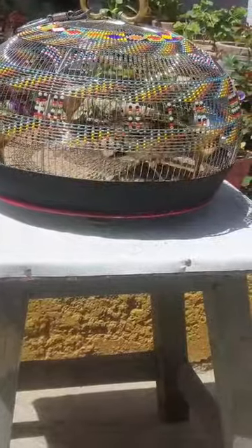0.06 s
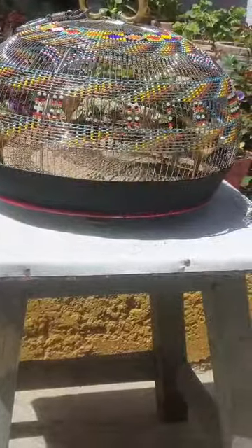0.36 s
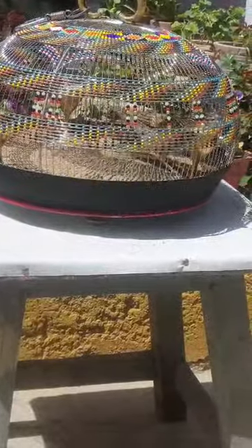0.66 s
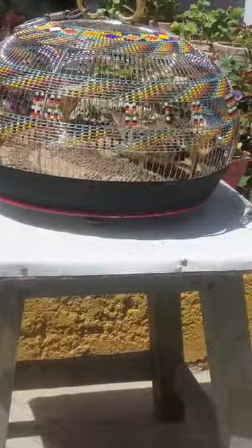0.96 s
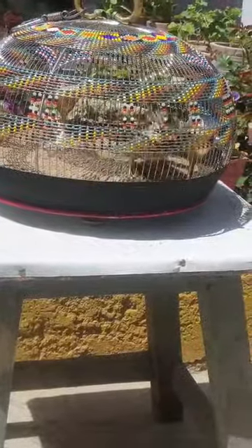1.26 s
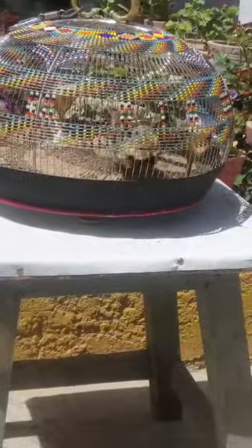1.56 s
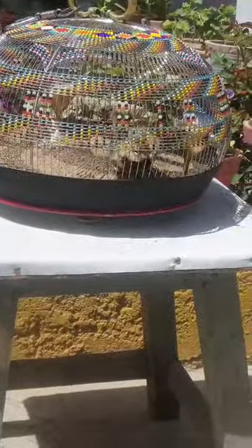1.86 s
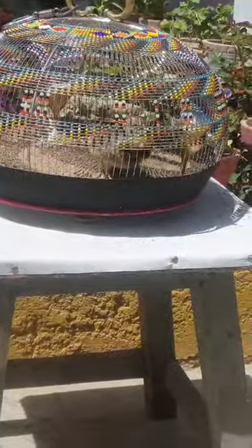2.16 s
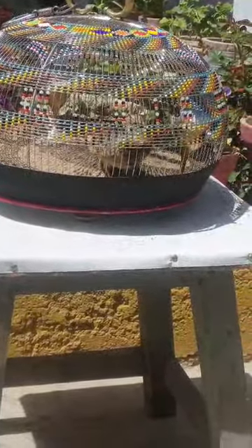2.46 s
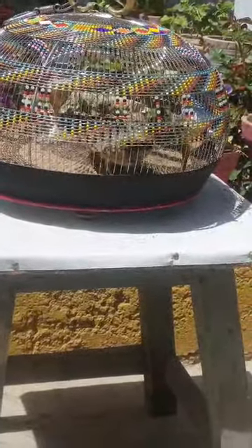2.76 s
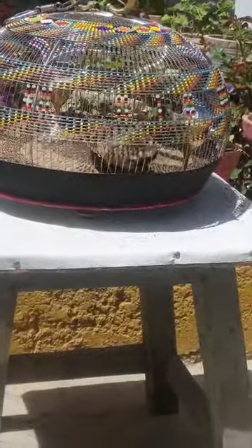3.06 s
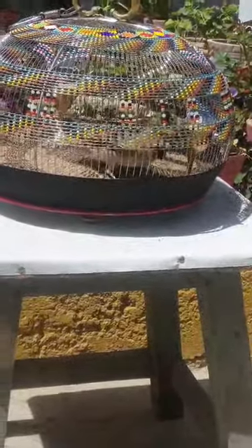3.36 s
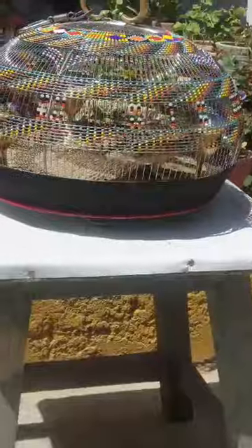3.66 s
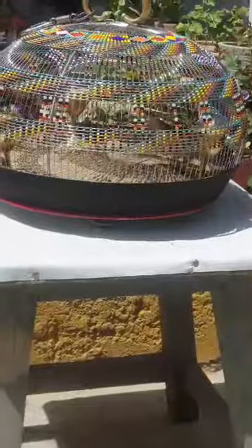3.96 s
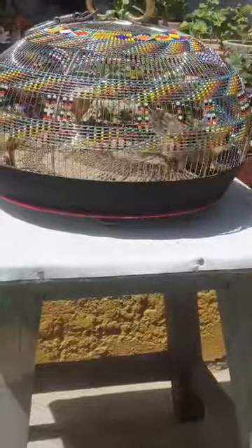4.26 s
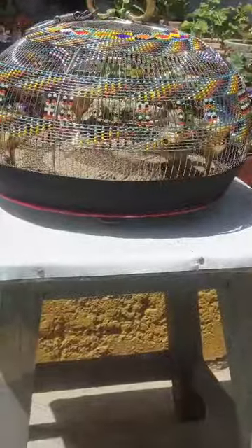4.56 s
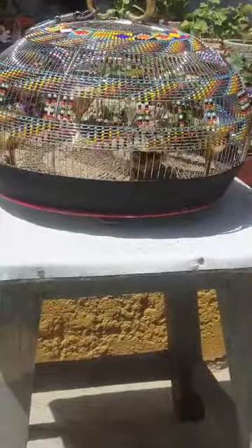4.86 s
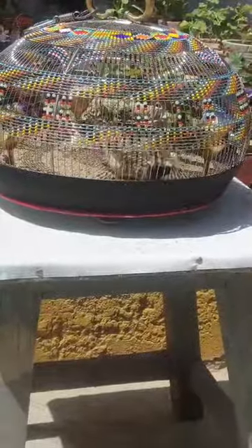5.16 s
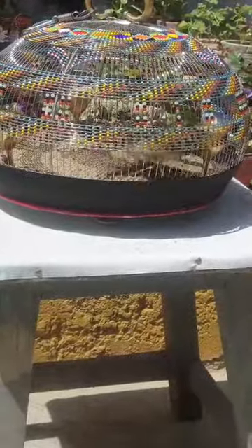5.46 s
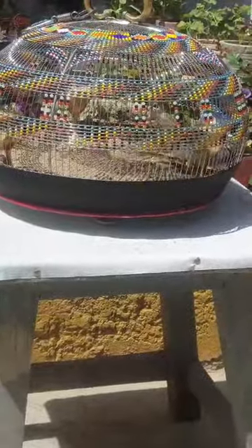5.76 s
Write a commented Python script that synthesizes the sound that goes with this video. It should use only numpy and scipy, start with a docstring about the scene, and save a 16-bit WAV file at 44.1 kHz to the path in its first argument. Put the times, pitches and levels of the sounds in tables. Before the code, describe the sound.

Small caged birds sing high chirps, a rapid trill, loud slurred whistles and two harsh rasps over a faint outdoor hum.

```python
"""Caged larks in a walled courtyard

Close to a two-port microphone, a phrase runs from thin seeps through rising hooks and dry chips into
a trill; loud slurred whistles and two harsh rasps follow. Membranes in the syrinx vibrate, throat and
beak filter the tone, and the walls reflect it. A bird scuffs the cage floor and pecks the wire;
others call farther off, over a faint motor hum and outdoor rumble."""
import sys
import numpy as np
from scipy import signal
from scipy.fft import rfft, irfft, next_fast_len
from scipy.io import wavfile
from scipy.ndimage import uniform_filter1d

SR = 44100
rng = np.random.default_rng(int(sys.argv[2]) if len(sys.argv) > 2 else 0)


def store_wav(level_fs):
    """Save 16-bit WAV to argv[1]."""
    pcm = np.round(np.clip(np.atleast_2d(level_fs), -1, 1) * 32767)
    wavfile.write(sys.argv[1], SR, pcm.T.astype(np.int16))


N = 264600
FREQS = np.fft.rfftfreq(N, 1 / SR)
TIME = np.arange(N) / SR

# The gesture of a chip. Each row: share of the note's length, pitch factor, relative level in dB.
CHIP_GESTURE = [(0, 0.62, -10.5), (0.301, 0.72, -10.5), (0.55, 0.97, -1), (0.798, 0.96, 3.5),
                (0.998, 0.76, -19.5)]


def whistles():
    """Pitch and effort move together: held notes scoop up and settle; slurs peak as they drop."""
    # Each row: start and length in seconds, peak, settled and final pitch in Hz, level in dB,
    # quivers per second, swing as a share of the pitch.
    held_notes = [(3.14, .06, 5350, 5074, 5100, -22.5, 150, 0.035),
                  (3.19, 0.11, 5280, 5170, 5160, -25.5, 96, 0.028),
                  (3.52, .14, 5316, 5175, 5210, -22.5, 80, 0.032),
                  (3.852, 0.13, 5430, 4910, 5003, -22.5, 240, 0.043),
                  (4.024, .145, 4714, 4475, 4740, -21, 120, 0.028),
                  (4.364, .14, 4626, 4422, 4660, -16.5, 117, 0.031)]
    # Each row: start, length and time to the drop in seconds, top and bottom pitch in Hz,
    # levels of drop and tail in dB before the fade, quivers per second.
    slurs = [(3.353, .125, .025, 5300, 3870, -13.5, -18, 81),
             (3.649, .16, .022, 5450, 4020, -14.5, -21, 61),
             (4.161, .13, .014, 4830, 3840, -16, -20.5, 126), (4.504, .11, .026, 4620, 3740, -15, -17, 96)]
    scoop_s, settle_s = 0.013, 0.034
    fall_hz_per_s, slur_settle_s = 52000, 0.016
    out = np.zeros(N)
    for s, length, peak_hz, settled_hz, final_hz, db, rate, swing in held_notes:
        t = np.arange(0, length, 1 / SR)
        hz = np.interp(t, [0, scoop_s, settle_s, length], [.87 * peak_hz, peak_hz, settled_hz, final_hz])
        effort_db = np.interp(t, [0, scoop_s, 0.49 * length, length], [-13.5, 0, 0, -14])
        add(out, s, whistle(hz, db + effort_db, rate, swing * np.minimum(t / settle_s, 1)))
    for s, length, drop_s, top_hz, bottom_hz, db, tail_db, rate in slurs:
        t = np.arange(0, length, 1 / SR)
        hz = np.clip((top_hz + bottom_hz) / 2 - fall_hz_per_s * (t - drop_s), bottom_hz, top_hz)
        tail_swing = 0.03 * np.clip(2 * (t - drop_s) / slur_settle_s - 1, 0, 1)
        effort_db = np.interp(t, [0, drop_s, drop_s + slur_settle_s], [db - 18, db, tail_db])
        fade_db = -14 * (t / length) ** 2
        add(out, s, whistle(hz, effort_db + fade_db, rate, tail_swing))
    return out


def whistle(hz, db, rate, swing):
    """Coupled frequency and amplitude modulation of a nearly pure tone; echoes turn it into beating."""
    # Throat and beak response. Each row: frequency in Hz, gain in dB.
    throat = [(2000, -24), (2700, -28.5), (3700, 5), (5400, -3), (7200, -4.5), (8900, 1.5), (11000, -4.5),
              (15500, 2.5)]
    turn = 2 * np.pi * np.cumsum(rate * (1 + .12 * wander(len(hz), 36))) / SR
    quiver = swing * np.sin(turn + .5 * np.sin(turn))  # lopsided swings
    level_db = db + .7 * wander(len(hz), 30) - 80 * quiver  # softer as the pitch swings up
    pitch = uniform_filter1d(hz, size=200) * (1 + quiver)
    tone = syrinx(pitch, throat, overtone_db=-22.5, jitter=.008, hiss_db=-37, half_db=-17.5)
    return amp(level_db) * tone


def seeps():
    """Resonance favours the second harmonic of thin rising notes; a hoarser note ends the run."""
    # Each row of both: start and length in seconds, pitch in Hz, level in dB.
    thin_notes = [(.031, 0.076, 3084, -22.5), (.217, 0.067, 3023, -20.5), (.384, .066, 2978, -19.5),
                  (.547, 0.047, 2925, -19)]
    hoarse_notes = [(.715, .041, 3200, -24.5)]
    # Each row: share of the note's length, pitch factor, relative level in dB.
    gesture = [(0, .82, -25.5), (.12, 0.875, -14), (.35, 0.94, -4.5), (.6, .985, -1), (.85, 0.97, -2.5),
               (1, .96, -19.5)]
    # Throat and beak response. Each row: frequency in Hz, gain in dB.
    throat = [(1800, -21), (3050, -2.5), (4300, 6.5), (5100, 12.5), (5900, 14), (7200, -13.5), (8600, 10.5),
              (10000, -23.5), (12000, -6.5), (15000, -4)]
    thin = syllables(thin_notes, gesture, throat, overtone_db=-7, jitter=.0015, hiss_db=-36)
    hoarse = syllables(hoarse_notes, CHIP_GESTURE, throat,
                       overtone_db=-16, jitter=.0077, hiss_db=-13.5, half_db=-41)
    return thin + hoarse


def chatter(flick_hz=4600, flick_s=0.0063, flick_db=-25.5):
    """Two-sided voicing: the syrinx's other side ends each hook in a flick; quicker dry chips follow."""
    # Each row of both: start and length in seconds, pitch in Hz, level in dB.
    hook_notes = [(0.831, 0.036, 3416, -19), (.926, 0.036, 3293, -20), (1.023, .04, 3290, -20.5),
                  (1.128, 0.036, 3267, -17.5)]
    chip_notes = [(1.226, 0.018, 1880, -25.5), (1.288, 0.016, 1514, -24), (1.347, 0.011, 1510, -23),
                  (1.401, 0.014, 1363, -25.5)]
    # Each row: share of the note's length, pitch factor, relative level in dB.
    hook_gesture = [(0, .33, -45), (0.301, 0.61, -9), (.5, 0.79, -14.5), (.62, 0.9, 0.5), (.74, 0.96, 1),
                    (.87, 0.95, 1), (1, 0.88, -3)]
    # Throat and beak responses. Each row: frequency in Hz, gain in dB.
    hook_throat = [(600, -36), (1300, 8), (3300, -7), (4500, 2), (6400, -5), (7800, -10), (9300, -8),
                   (11000, -21), (12700, -8.5), (15500, -23)]
    chip_throat = [(700, -30), (3000, 15.5), (4200, 6.5), (6500, -13), (9000, -10), (15500, -23)]
    hooks = syllables(hook_notes, hook_gesture, hook_throat, overtone_db=-25, jitter=.0022, hiss_db=-40)
    flick_pitch = flick_hz * np.geomspace(1, .93, int(flick_s * SR))
    for s, length, _, db in hook_notes:
        add(hooks, s + length - flick_s, amp(db + flick_db) * pure_note(flick_pitch))
    chips = syllables(chip_notes, CHIP_GESTURE, chip_throat, overtone_db=-1, jitter=.012, hiss_db=-14)
    return hooks + chips


def trill(count=20, start_s=1.45, gap_s=.04835, slowing_s=.00058, loudest_s=2.01):
    """Slowing, arched notes each end in a flick as the third harmonic falls into a throat resonance."""
    # Each row: share of the note's length, pitch factor, relative level in dB.
    gesture = [(0, .94, -15), (.2, .99, -4), (.45, 1.01, -1), (.64, .99, -4), (.74, 1.05, -15),
               (.85, .88, -5), (1, .72, -24)]
    # Throat and beak response. Each row: frequency in Hz, gain in dB.
    throat = [(1000, -15.5), (1750, -7), (2450, 6), (3200, 7), (3900, -22), (7000, -20), (9300, -47.5),
              (12000, -23.5), (13500, -47)]
    k = np.arange(count)
    starts = start_s + gap_s * k + slowing_s * k * (k - 1) / 2
    levels_db = -24.5 - 13 * (starts - loudest_s) ** 2 + .7 * rng.standard_normal(count)
    lengths = .028 * (1 + .05 * rng.standard_normal(count))
    pitches_hz = 1241.3 + 12.5 * (levels_db + 23.5)  # stronger notes are higher
    notes = zip(starts, lengths, pitches_hz, levels_db)
    return syllables(notes, gesture, throat, overtone_db=3, jitter=.011, hiss_db=-20, half_db=-14)


def rasps(rest_hz=1376, upper_hz=2300, hold_s=0.074, fade_db_per_s=110):
    """Biphonation: where the fluttering call is rough, the syrinx's other side joins in higher up."""
    # Each row: start and length in seconds, top pitch in Hz, time to the top, width of the rise and
    # attack in seconds, overtone gain in dB, final flutters per second, level in dB.
    calls = [(4.955, .335, 1788, .07, .21, .044, -20, 42, -34),
             (5.442, .34, 2116, 0.084, .115, 0.0135, -28, 66, -34)]
    # Throat and beak response. Each row: frequency in Hz, gain in dB.
    throat = [(800, -5), (1700, -7.5), (2450, 19), (3300, 0.5), (3800, -17), (5400, -15), (6700, -13),
              (7800, -41), (11000, -24), (14000, -52)]
    out = np.zeros(N)
    for s, length, top_hz, top_s, width_s, attack_s, overtone_db, last_rate, level_db in calls:
        t = np.arange(0, length, 1 / SR)
        hz = rest_hz + (top_hz - rest_hz) * np.exp(-((t - top_s) / width_s) ** 2)
        onset_db = -21 * np.maximum(1 - t / attack_s, 0)
        fade_db = -fade_db_per_s * np.maximum(t - top_s - hold_s, 0)
        rough = 1 / (1 + ((t - .1) / .064) ** 6)  # the voice breaks up while pushed hardest
        rate = np.geomspace(62, last_rate, len(t)) * (1 + 0.094 * wander(len(t), 50))
        arch = abs(np.sin(np.pi * np.cumsum(rate) / SR)) - 2 / np.pi
        flutter = 1 + 0.15 * arch
        lower = syrinx(hz * flutter, throat, overtone_db, jitter=0.014 + 0.023 * rough, hiss_db=-26)
        upper = syrinx(upper_hz * flutter, throat, overtone_db=3.5, jitter=0.0575, hiss_db=-24)
        upper_share = 0.67 * rough
        voice = np.sqrt(1 - upper_share) * lower + np.sqrt(upper_share) * upper
        add(out, s, amp(level_db + onset_db + fade_db + 4.9 * arch) * voice)
    return out


def syllables(notes, gesture, throat, overtone_db, jitter, hiss_db, half_db=-np.inf):
    """One gesture modulates the pitch and amplitude of every note, never quite alike."""
    out = np.zeros(N)
    share, bend, effort_db = np.transpose(gesture)
    for s, length, hz, db in notes:
        progress = np.linspace(0, 1, int(length * SR))
        pitch = hz * np.interp(progress, share, bend) * (1 + 0.015 * wander(len(progress), 160))
        envelope = amp(db + np.interp(progress, share, effort_db))
        add(out, s, envelope * syrinx(pitch, throat, overtone_db, jitter, hiss_db, half_db))
    return out


def syrinx(hz, throat, overtone_db, jitter, hiss_db, half_db=-np.inf):
    """Source and filter: a jittering membrane tone and air hiss pass the throat; power is near 1."""
    size = len(hz)
    phase = 2 * np.pi * np.cumsum(hz * (1 + jitter * wander(size, 484))) / SR
    order = np.arange(1, 25)[:, None] / 2  # unequal cycles add half-order lines
    source_db = overtone_db * (order > 1) + np.where(order % 1 > 0, half_db, 0)
    gains = amp(source_db + read(throat, order * hz)) * (order * hz < SR / 2)
    tone = (gains * np.sin(order * phase)).sum(0) / np.sqrt((gains ** 2).sum(0) / 2)
    soft_edges = signal.windows.tukey(size, min(0.0016 * SR / size, 1))
    return (tone + amp(hiss_db) * coloured_noise(size, throat)) * soft_edges


def pure_note(hz, waver_hz=55):
    """Random frequency modulation makes a soft-edged sine waver."""
    hz = hz + waver_hz * wander(len(hz), 500)
    return unit(np.sin(2 * np.pi * np.cumsum(hz) / SR)) * signal.windows.tukey(len(hz), .2)


def scuff(peak_s=1.936, width_s=0.089, level_db=-43.5, grain_db=3):
    """Friction on the cage floor gives a grainy rustle that swells and dies away."""
    # Each row: frequency in Hz, relative spectral density in dB.
    spectrum = [(700, -23), (1400, -3.5), (3000, 3), (6000, -12), (8000, -22), (10000, -28), (15000, -42)]
    rustle = unit(coloured_noise(N, spectrum) * amp(grain_db * wander(N, 230)))
    return amp(level_db) * rustle * np.exp(-((TIME - peak_s) / width_s) ** 2)


def peck(start_s=5.344, hz=4380, level_db=-44, decay_s=0.00094):
    """An impact on the cage wire excites one heavily damped mode: a tiny dry tick."""
    out, t = np.zeros(N), TIME[:SR // 50]
    add(out, start_s, amp(level_db) * np.sin(2 * np.pi * hz * t) * np.exp(-t / decay_s))
    return out


def far_birds(twitter_swing=.16, twitter_period_s=.065, buzz_hz=5350):
    """Frequency-modulated calls, faint with distance: twitters, rising glides, a buzz and a low cry."""
    # Each row: start and length in seconds, centre pitch in Hz, final level in dB.
    twitters = [(0.166, .05, 4220, -57), (0.421, 0.057, 3840, -50), (2.663, 0.075, 3640, -49.5),
                (2.823, 0.063, 3680, -52)]
    # Each row: start and length in seconds, first and last pitch in Hz, level in dB.
    glides = [(0.35, 0.024, 3300, 4900, -57), (2.868, 0.012, 4900, 6160, -51.5),
              (2.941, 0.023, 5040, 5980, -51.5), (3.092, .25, 1430, 1791, -57),
              (3.11, 0.027, 2397, 4460, -49.5)]
    # Each row: time in seconds, level in dB.
    buzz_curve = [(5.2, -63), (5.4, -57), (5.58, -60)]
    # Each row: time in seconds, pitch in Hz, level in dB.
    cry_curve = [(5.74, 1015, -62), (5.85, 945, -49.5), (5.93, 921, -52), (6, 916, -49)]
    # Throat and beak response. Each row: frequency in Hz, gain in dB.
    cry_throat = [(450, -31.5), (950, 13.5), (1850, 25.5), (2800, -24.5), (6000, -32), (8000, -50)]
    out = np.zeros(N)
    for s, length, hz, db in twitters:
        swing = np.cos(2 * np.pi * np.arange(0, length, 1 / SR) / twitter_period_s)
        rise_db = np.linspace(-7, 0, len(swing))
        add(out, s, amp(db + rise_db) * pure_note(hz * (1 + twitter_swing * swing)))
    for s, length, first_hz, last_hz, db in glides:
        add(out, s, amp(db) * pure_note(np.geomspace(first_hz, last_hz, int(length * SR))))
    s, db = follow(buzz_curve)
    hz = buzz_hz * (1 + .04 * wander(len(db), 520))
    buzz = unit(np.sin(2 * np.pi * np.cumsum(hz) / SR))
    add(out, s, amp(db) * buzz * signal.windows.tukey(len(hz), .5))
    s, hz, db = follow(cry_curve)
    add(out, s, amp(db) * syrinx(hz, cry_throat, overtone_db=-5, jitter=0.047, hiss_db=-20))
    return out


def hum():
    """Periodic vibration of a distant motor gives spectral lines that waver a little."""
    # Each row: frequency in Hz, level in dB.
    lines = [(146.6, -52), (195.6, -62), (538.3, -67)]
    drifting_time = np.cumsum(1 + 0.00401 * wander(N, 2.96)) / SR
    out = np.zeros(N)
    for hz, db in lines:
        envelope = amp(db + 0.41 * wander(N, 2.8))
        out += envelope * unit(np.sin(2 * np.pi * (hz * drifting_time + rng.random())))
    return out


def air(mid_band_db=-62):
    """Partly coherent noise: outdoor rumble and soft hiss, most alike at the two ports in the bass."""
    # Each row: frequency in Hz, relative spectral density in dB.
    spectrum = [(20, -28), (50, 0), (130, -4.5), (230, -8.5), (350, -17), (550, -16.5), (1200, -26.5),
                (2100, -33), (4000, -29), (6000, -35), (8000, -50), (15500, -50)]
    # Each row: frequency in Hz, correlation between left and right.
    correlation = [(30, 0.79), (130, 0.9), (500, 0.71), (3000, 0.67)]
    left, independent = rfft(rng.standard_normal((2, N)))
    likeness = read(correlation, FREQS)
    right = likeness * left + np.sqrt(1 - likeness ** 2) * independent
    ports = np.array([left, right]) * amp(read(spectrum, FREQS))
    mid_band_rms = irfft(ports[0] * (FREQS > 250) * (FREQS < 900), N).std()
    return irfft(ports, N) / mid_band_rms * amp(mid_band_db)


def courtyard(sound, direct_db, echo_db, tail_db):
    """Superposition of direct sound, early reflections and the diffuse reverberation of the walls."""
    # Echoes off cage floor, table and wall. Each row: delay in seconds, left gain, right gain.
    echoes = [(.0021, 0.67, -0.12), (.0047, -0.28, 0.15), (.0083, -0.021, -.14)]
    # Each row: frequency in Hz, seconds to decay by 60 dB.
    decay_times = [(3000, .31), (5500, .33), (9000, .28), (15000, .2)]
    # Each row: frequency in Hz, phase lead of the left port in radians.
    port_lead = [(0, 0), (1500, 1), (2400, 2.3), (3100, 3.6), (4000, 4.1), (5300, 8.1), (7000, 10),
                 (8300, 13.8), (9500, 15.4), (12000, 19.4), (15000, 28)]
    size, reflections_per_s = SR * 3 // 4, 3000
    taps = rng.choice([-1., 1.], (2, size)) * (rng.random((2, size)) < reflections_per_s / SR)
    hz, t, bands = signal.stft(taps, SR, nperseg=256)
    decay = amp(-60 * t / read(decay_times, hz)[:, None])
    tail = signal.istft(bands * decay, SR, nperseg=256)[1]
    tail *= np.minimum(TIME[:tail.shape[1]] / 0.0064, 1)
    tail /= np.sqrt(np.mean(abs(rfft(tail))[:, size // 20:size // 7] ** 2))  # unit gain in the song band
    reverberation = signal.fftconvolve(sound[None], tail, axes=1)[:, :N]
    early = sum(np.outer([left, right], np.exp(-2j * np.pi * FREQS * s)) for s, left, right in echoes)
    right_lag = np.exp(-1j * np.outer([0, 1], np.interp(FREQS, *np.transpose(port_lead))))
    near = (amp(direct_db) + amp(echo_db) * early) * right_lag
    return irfft(rfft(sound) * near, N) + amp(tail_db) * reverberation


def amp(db):
    """Decibels to gain."""
    return 10 ** (np.asarray(db) / 20)


def pan(left_db):
    """Left and right gains for a level difference of left_db."""
    return amp(left_db * np.array([[.5], [-.5]]))


def unit(x):
    """Scales to rms 1."""
    return x / np.sqrt(np.mean(x ** 2) + 1e-20)


def read(points, hz):
    """Interpolates a spectrum on a log-frequency axis."""
    f, value = np.transpose(points)
    return np.interp(np.log(hz + 1), np.log(f + 1), value)


def follow(rows):
    """Start time and every column of a curve, interpolated sample by sample."""
    s, *columns = np.transpose(rows)
    t = np.arange(s[0], s[-1], 1 / SR)
    return s[0], *(np.interp(t, s, column) for column in columns)


def add(mix, s, sound):
    """Superposes a sound on the mix at s seconds."""
    part = mix[max(round(s * SR), 0):][:len(sound)]
    part += sound[:len(part)]


def wander(size, hz):
    """Random motion of rms near 1, low-passed at hz."""
    f = np.fft.rfftfreq(next_fast_len(size + SR // 20), 1 / SR)
    spectrum = rng.standard_normal(len(f)) + 1j * rng.standard_normal(len(f))
    return unit(irfft(spectrum / (1 + (f / hz) ** 4)))[:size]


def coloured_noise(size, spectrum):
    """White noise filtered to a spectrum, at rms 1."""
    gains = amp(read(spectrum, np.fft.rfftfreq(size, 1 / SR)))
    return unit(irfft(rfft(rng.standard_normal(size)) * gains, size))


def scene():
    """Directivity: the near birds face different ways, so each has its own share of echo."""
    # The swell of hum and air. Each row: time in seconds, gain in dB.
    swell = [(.4, -1), (2.3, 3.5), (4.7, -1)]
    birds = courtyard(seeps(), direct_db=0.5, echo_db=-3, tail_db=-6.5)
    birds += courtyard(chatter(), direct_db=-1, echo_db=-2, tail_db=-10.5)
    birds += pan(left_db=-1) * courtyard(trill(), direct_db=1, echo_db=0, tail_db=-12)
    birds += courtyard(whistles(), direct_db=-0.5, echo_db=3.5, tail_db=-6.5)
    birds += pan(left_db=-1.5) * courtyard(rasps(), direct_db=-2, echo_db=0, tail_db=-3.5)
    birds += courtyard(scuff() + peck(), direct_db=-1, echo_db=5, tail_db=-3)
    birds += courtyard(far_birds(), direct_db=-4, echo_db=-14, tail_db=-8)
    return birds + amp(np.interp(TIME, *np.transpose(swell))) * (hum() + air())


def record(dry, cutoff_hz=15900):
    """Each microphone port has its own frequency response; a low-pass filter limits the band."""
    # Each row: frequency in Hz, left minus right level in dB.
    balance = [(400, 0), (1350, 3), (1700, -5.5), (2300, 0), (3100, -.5), (4200, 1.5), (4900, 5.5),
               (6500, 7.5), (8700, -14), (10900, -2), (12400, -5), (14500, 7)]
    tilt = pan(read(balance, FREQS))
    ports = irfft(rfft(dry) * tilt / np.sqrt((tilt ** 2).mean(0)), N)
    low_pass = signal.firwin(511, cutoff_hz, window=("kaiser", 9), fs=SR)
    return signal.oaconvolve(ports, low_pass[None], "same")


dry = scene()
out = record(dry)
store_wav(out)
```